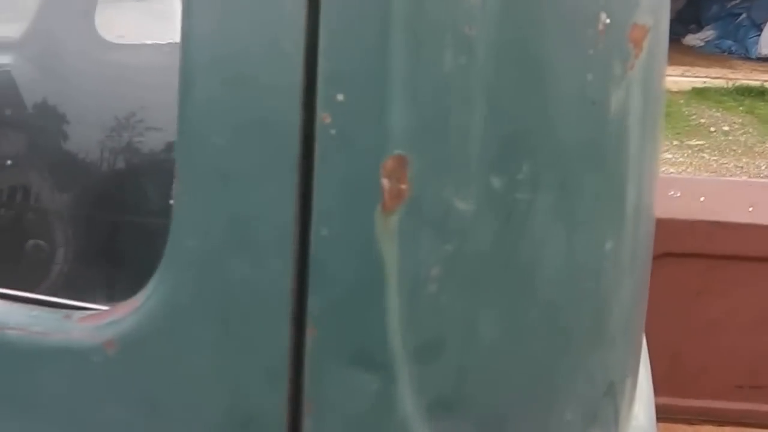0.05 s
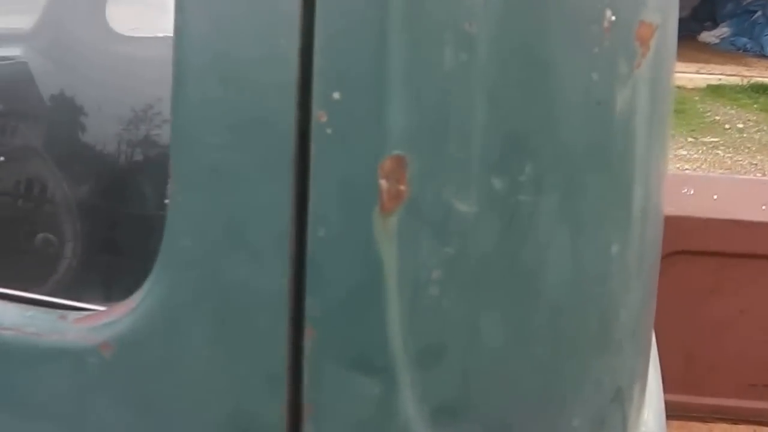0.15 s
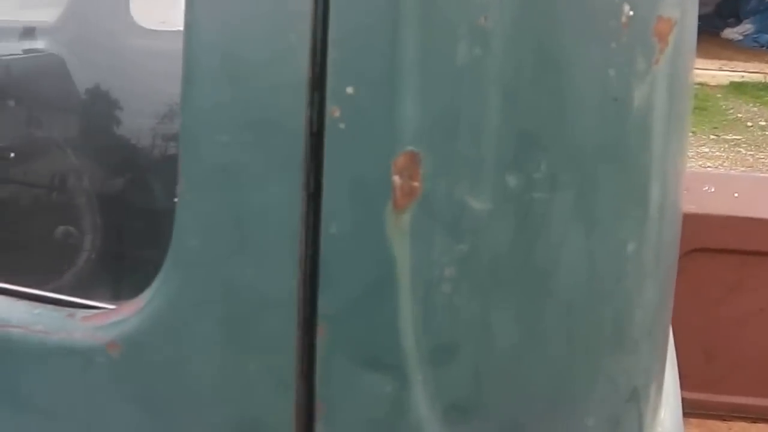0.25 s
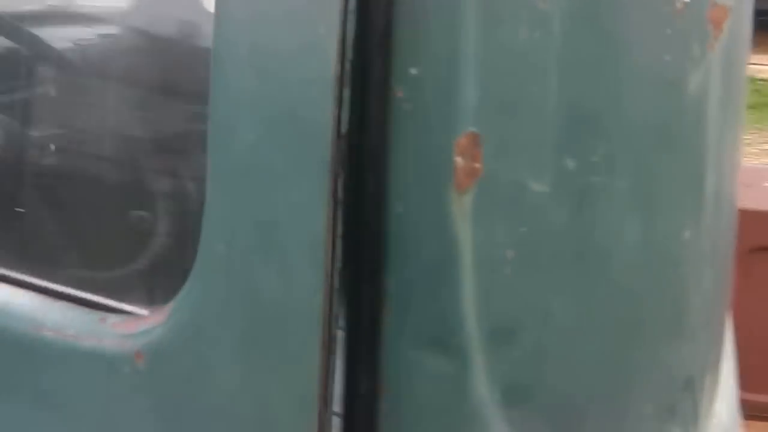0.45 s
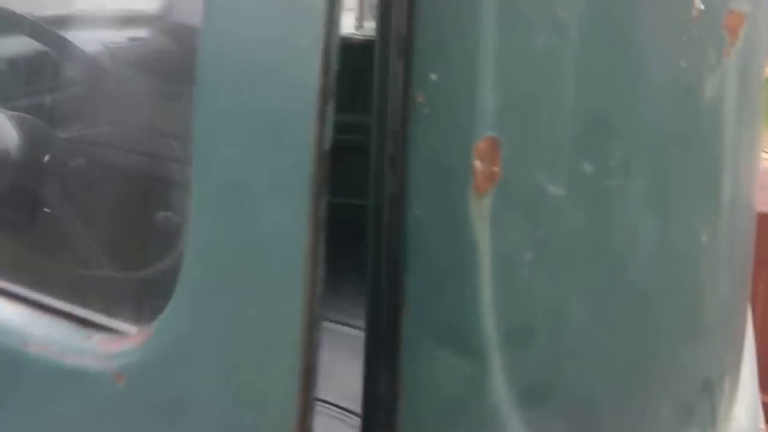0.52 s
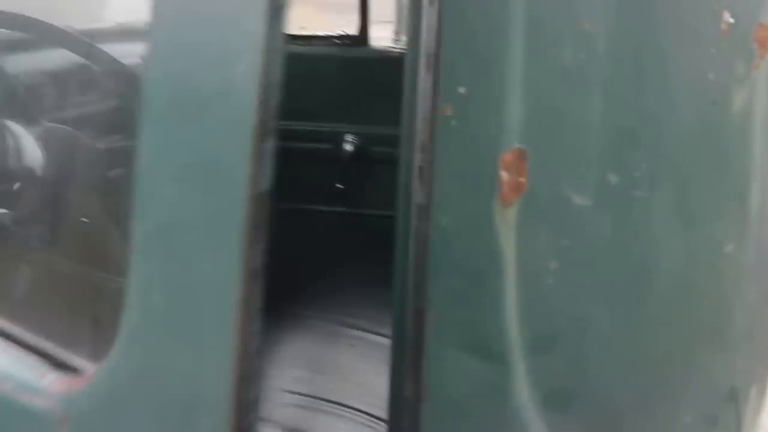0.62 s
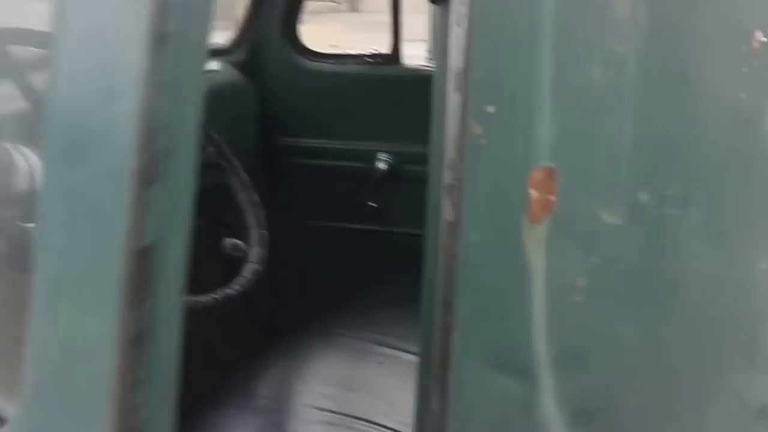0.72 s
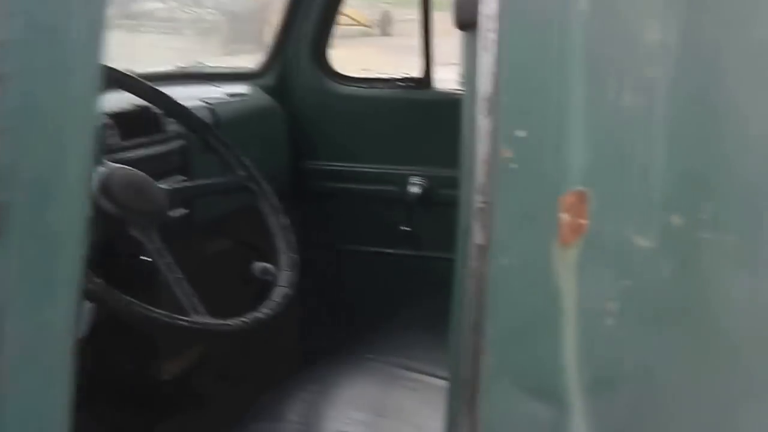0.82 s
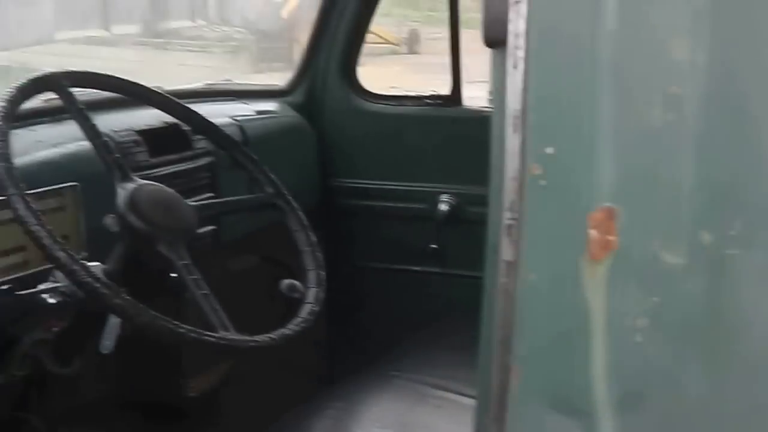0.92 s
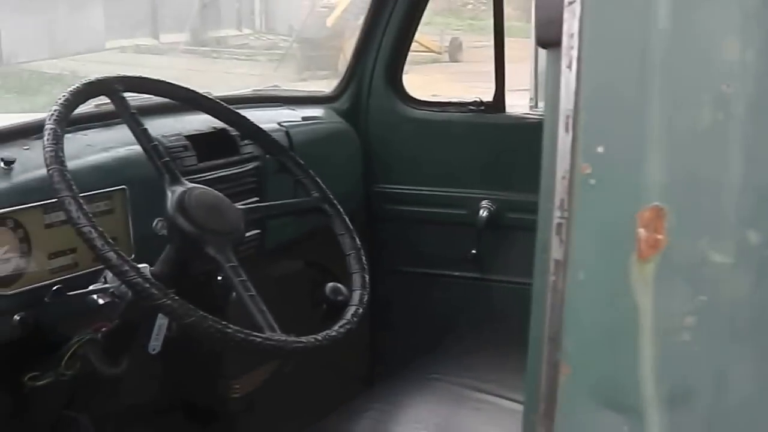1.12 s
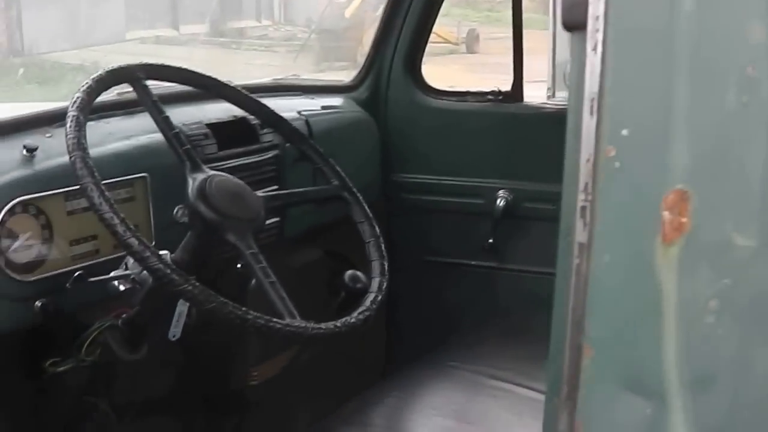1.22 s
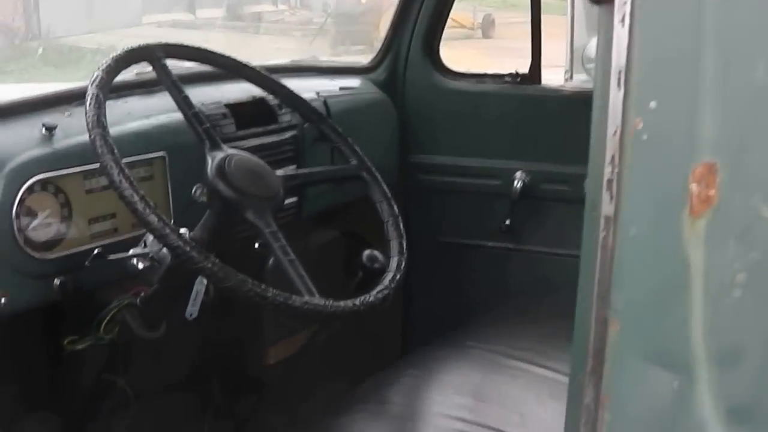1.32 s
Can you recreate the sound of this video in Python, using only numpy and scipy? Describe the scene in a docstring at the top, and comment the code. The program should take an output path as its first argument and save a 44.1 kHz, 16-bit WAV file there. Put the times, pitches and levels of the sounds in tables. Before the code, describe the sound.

Old truck door opening outdoors, with a latch clunk, a brief hinge squeak and a scrape.

```python
"""Outdoors, close to an old truck, on a hand-held stereo microphone: the steel door is opened.
First the loose handle rattles, then the latch bolt groans and lets go with a clunk. The dry hinge gives a
shrill squeak, mostly on the left; the door scrapes and clunks again as it swings, and last a faint
squeal trails off. Panel and cab ring after each blow; soft low bumps and outdoor air lie underneath."""
import sys
import numpy as np
from scipy import signal
from scipy.fft import rfft, irfft, next_fast_len
from scipy.io import wavfile
from scipy.ndimage import uniform_filter1d, minimum_filter1d, map_coordinates

SR = 44100
rng = np.random.default_rng(int(sys.argv[2]) if len(sys.argv) > 2 else 0)


def master(y):
    """Save y as 16-bit WAV."""
    cut = np.clip(np.atleast_2d(y).T, -1, 1)
    pcm = np.round(cut * 32767)  # scale
    wavfile.write(sys.argv[1], SR, pcm.astype(np.int16))


N = 59535

# blows as the latch lets go (time [s], clatter [dB], tilt [dB/octave], ring [dB], focus [Hz])
LATCH_BLOWS = [(.166, -37.5, -8, -39.5, 377), (.2195, -20.5, -1, -19.5, 780), (.2289, -24.5, 5, -16, 840),
               (.2593, -16.5, 4.5, -41, 1300), (.27, -14.5, 1, -15.5, 385), (.287, -25.5, 1, -17, 1320),
               (.3087, -34, -5, -24.5, 394)]
# jolts on the hinges (time [s], clatter [dB], tilt [dB/octave], ring [dB], focus [Hz])
SWING_BLOWS = [(.6432, -22.5, 4.5, -58, 1760), (.657, -27.5, 6.5, -29, 407), (.676, -28, -1.5, -24.5, 485),
               (.7065, -27.5, 13.5, -23.5, 1080), (.7165, -25.5, -2, -17, 676)]
# the door ringing in its frame (frequency [Hz], level [dB], t60 [s])
SHUT_MODES = [(363.5, 0.5, 0.33), (404.6, 0, 0.28), (795.4, -1.5, 0.29), (851, -4, 0.15), (1148, -8, 0.073),
              (1284.4, -2.5, 0.15), (1565, -18, 0.19)]
# the free door panel (frequency [Hz], level [dB], t60 [s])
OPEN_MODES = [(120.2, 13, 1), (277, -1, 0.47), (377, 4.5, 0.32), (593.5, -1, 0.23), (750, 1.5, 0.16),
              (880, -18, 0.34), (1085, 0, 0.088), (1610, -26, 0.08), (1843, -13, 0.97)]
# clatter of struck steel (frequency [Hz], level [dB])
STEEL_SPECTRUM = [(40, -21), (130, -7), (240, -11), (500, -7), (850, -3.5), (1500, -1.5), (2300, -10.5),
                  (6500, -21), (9000, -31.5)]
# decay of that clatter (frequency [Hz], t60 [s])
STEEL_T60 = [(200, 0.67), (1000, 0.17), (3000, 0.19), (14000, 0.088)]
# metal rubbing on metal (start [s], end [s], level [dB], rise [s], release [s], tilt [dB/octave])
SCRAPES = [(0, 0.05, -42.5, 0.00065, 0.51, 2), (0.113, 0.21, -34.5, 0.14, 0.023, 2.5),
           (0.192, 0.273, -20.5, 0.063, 0.19, 1.5), (0.401, 0.496, -39.5, 0.077, 0.16, 6),
           (0.56, 0.652, -28, 0.15, 0.038, 0), (0.642, 0.709, -21.5, 0.018, 0.18, 0)]
# colour of the rubbing (frequency [Hz], level [dB])
RUB_SPECTRUM = [(100, -15), (400, 4.5), (1600, 1.5), (2400, -1), (6000, -14), (10000, -20.5)]
# the hinge squeak (time [s], pitch [Hz], level [dB], left over right [dB])
SQUEAK_PATH = [(0.461, 5620, -52, 10), (.464, 5784, -19, 14), (0.473, 5756, -9, 10.5),
               (0.484, 5722, -7.5, 3), (0.495, 5655, -11, 9), (0.503, 5690, -22, 1), (.52, 5676, -24, -23),
               (0.534, 5625, -37, 22), (0.612, 5590, -77, 2)]
# hiss around the squeak (frequency [Hz], level [dB])
HISS_SPECTRUM = [(2000, -24), (4750, -5), (5700, 4), (8000, -29), (11400, -10), (16000, -24)]
# latch bolt and hinge sliding under load (start [s], end [s], first pitch [Hz], last [Hz], level [dB])
GROANS = [(0.234, .284, 1095, 1315, -19.5), (0.454, 0.504, 981, 1020, -38.5)]
# dry clicks of handle and latch (time [s], level [dB], t60 [s])
CLICKS = [(0.0697, -36, 0.004), (0.2595, -34, 0.03), (0.6231, -29.5, 0.22), (0.7079, -6.5, 0.016),
          (.7105, -20.5, 0.1), (0.981, -38.5, 0.019)]
# colour of a click (frequency [Hz], level [dB])
CLICK_SPECTRUM = [(1500, 8.5), (7000, -2), (12000, -2.5)]
# the loose handle ticking (time [s], level [dB])
HANDLE_TICKS = [(.005, -33.5), (0.0143, -38.5), (.028, -35.5), (0.055, -31.5), (0.0673, -25.5),
                (0.086, -38)]
# the handle's ring (frequency [Hz], level [dB])
HANDLE_MODES = [(1280, -8.5), (1700, -5), (2750, -9), (3950, -8.5)]
# the two drifting tones of the squeal (time [s], low pitch [Hz], high pitch [Hz], level [dB])
SQUEAL_PATH = [(1.012, 5780, 5970, -57), (1.02, 5560, 5960, -38.5), (1.059, 5360, 5640, -39.5),
               (1.138, 5290, 5800, -45), (1.17, 5380, 5600, -49.5), (1.32, 5350, 5630, -59.5)]
# decay of the cab and the yard (frequency [Hz], t60 [s])
CAB_T60 = [(1500, 0.75), (5500, 0.25)]
# soft bumps on the microphone (time [s], level [dB])
BUMPS = [(0.045, -31.5), (0.078, -34), (0.123, -36), (.17, -35.5), (0.572, -40.5), (0.662, -31),
         (1.186, -36), (1.263, -40.5)]
# colour of a bump (frequency [Hz], level [dB])
BUMP_SPECTRUM = [(25, -14.5), (110, -1.5), (170, -6), (260, -27), (800, -46)]
# outdoor air (frequency [Hz], level [dB])
AIR_SPECTRUM = [(25, -4.5), (120, 7), (220, -17.5), (400, -6), (700, -16.5), (1700, -15.5), (4000, -20),
                (9000, -27.5)]
# stereo image of door, cab and bumps (frequency [Hz], left-right correlation [-1 to 1])
CLOSE_IMAGE = [(60, 0.075), (140, 0.94), (1200, 1), (3100, 0.66), (7000, 0.065)]
# stereo image of air and hiss (frequency [Hz], left-right correlation [-1 to 1])
AIR_IMAGE = [(100, -0.62), (400, 0.73), (7000, -0.14)]
# the door's balance at the microphone (frequency [Hz], left over right [dB])
DOOR_BALANCE = [(1400, -1), (4400, 3), (8100, 5), (15000, -2.5)]

DOOR_FREE_S = .5  # scrapes from here on sound through the free panel
ATTACK_S, FOCUS_DB_PER_OCTAVE = 0.00045, 15.5
BODY_DB, BODY_WIDTH_HZ = 4, 38
RATTLE_DB, RATTLE_PER_S, RATTLE_JITTER_HZ = 2, 60, 22
SLIP_DB, SLIPS_PER_S = 2.3, 260
OCTAVE_DB, HISS_DB = -7.5, -19.5
UNDERTONE_HZ, UNDERTONE_DB, UNDERTONE_FROM_S = 5490, -12, .488
SQUEAL_UPPER_DB, SQUEAL_PAN_DB, CHATTER_DB, CHATTER_PER_S = -5, 4.5, 2.5, 170
DOOR_WET_DB, SQUEAK_WET_DB, SQUEAL_WET_DB = -20, -10.5, -9
AIR_DB, BUMP_WIDTH_S, MIC_LAG_S = -44.5, .015, 5e-5
NOTCH_HZ, NOTCH_WIDTH_HZ, NOTCH_DB = 7850, 350, -15
LIMIT, LIMITER_HOLD_S, TOP_HZ = .97, .003, 15900


def door_body(blow_rows, scrape_rows, modes):
    """Blows and scrapes pass through the hollow door, which favours its modes."""
    def near_mode(hz):
        return np.max([np.exp(-((hz - mode[0]) / BODY_WIDTH_HZ) ** 2) for mode in modes], axis=0)
    clatter, ring = blows(blow_rows, modes)
    return ring + filtered(clatter + scrapes(scrape_rows), lambda hz: amp(BODY_DB * near_mode(hz)))


def blows(rows, modes):
    """A blow sets off steel clatter and the modes near its focus, which waver as the panel rattles."""
    clatter, ring = np.zeros((2, N)), np.zeros((2, N))
    attack = 1 - np.exp(-clock() / ATTACK_S)
    for start, clatter_db, tilt, ring_db, focus_hz in rows:
        tones = np.zeros(N)
        for hz, db, t60 in modes:
            off_focus_db = FOCUS_DB_PER_OCTAVE * abs(np.log2(hz / focus_hz))
            level = amp(db - off_focus_db + RATTLE_DB * wobble(RATTLE_PER_S))
            tones += level * fade(t60) * np.sin(unsteady_phase(hz, RATTLE_JITTER_HZ))
        steel = fade_by_band(noise(STEEL_SPECTRUM, CLOSE_IMAGE, tilt), STEEL_T60)
        add(clatter, start, attack * amp(clatter_db) * steel)
        add(ring, start, attack * amp(ring_db) * tones)
    return clatter, ring


def scrapes(rows):
    """Metal rubs on metal in uneven slips; each stroke swells, holds and lets go."""
    out, t = np.zeros((2, N)), clock()
    for start, end, db, rise, release, tilt in rows:
        stroke = np.clip((t - start) / rise, 0, 1) * amp(-60 * np.maximum(t - end, 0) / release)
        rub = noise(RUB_SPECTRUM, CLOSE_IMAGE, tilt) * amp(SLIP_DB * wobble(SLIPS_PER_S))
        out += amp(db) * stroke * unit_rms(rub)
    return out


def hinge_squeak():
    """The dry hinge sings a high note with its octave and a hiss; a lower tone joins and beats with it."""
    t = clock()
    times, *columns = np.transpose(SQUEAK_PATH)
    hz, db, side_db = (np.interp(t, times, column) for column in columns)
    level = amp(db) * (t > times[0]) * (t < times[-1])
    phase = unsteady_phase(hz, jitter_hz=20)
    joining = np.clip((t - UNDERTONE_FROM_S) / ATTACK_S, 0, 1)
    undertone = amp(UNDERTONE_DB) * joining * np.sin(unsteady_phase(UNDERTONE_HZ, jitter_hz=40))
    flutter = amp(1.5 * np.array([wobble(110), wobble(110)]))  # each channel on its own
    tones = pan(side_db) * np.sin(phase) + undertone + amp(OCTAVE_DB) * np.sin(2 * phase)
    hiss = amp(HISS_DB) * noise(HISS_SPECTRUM, AIR_IMAGE)
    direct = level * (np.sqrt(2) * flutter * tones + hiss)
    return from_hinge_side(direct) + amp(SQUEAK_WET_DB) * cab_echo(direct)


def groans():
    """Sliding metal sings briefly, its pitch rising with the load."""
    out, t = np.zeros(N), clock()
    for start, end, first_hz, last_hz, db in GROANS:
        travel = np.clip((t - start) / (end - start), 0, 1)
        phase = unsteady_phase(first_hz + (last_hz - first_hz) * travel, jitter_hz=25)
        out += amp(db + SLIP_DB * wobble(SLIPS_PER_S)) * np.sin(np.pi * travel) * np.sin(phase)
    return out


def latch_clicks():
    """Latch and handle parts meet in short bright contacts."""
    out, attack = np.zeros((2, N)), 1 - fade(t60=0.0031)
    for start, db, t60 in CLICKS:
        add(out, start, amp(db) * noise(CLICK_SPECTRUM, CLOSE_IMAGE) * fade(t60) * attack)
    return out


def handle_rattle():
    """Each tick snaps and rings the loose handle briefly."""
    out, t = np.zeros((2, N)), clock()
    for start, db in HANDLE_TICKS:
        ring = sum(amp(level) * np.sin(2 * np.pi * (hz * t + rng.random())) for hz, level in HANDLE_MODES)
        snap = noise(CLICK_SPECTRUM, CLOSE_IMAGE)
        add(out, start, amp(db) * (ring + snap) * fade(t60=0.039))
    return out


def hinge_squeal():
    """A weak, rough double tone, left of centre, chatters and breaks up as the door slows."""
    times, low_hz, high_hz, db = np.transpose(SQUEAL_PATH)
    t = clock()

    def tone(hz):
        chatter = amp(CHATTER_DB * wobble(CHATTER_PER_S))
        return chatter * np.sin(unsteady_phase(np.interp(t, times, hz), jitter_hz=58))
    level = amp(np.interp(t, times, db, left=-120, right=-120))
    direct = pan(SQUEAL_PAN_DB) * level * unit_rms(tone(low_hz) + amp(SQUEAL_UPPER_DB) * tone(high_hz))
    return from_hinge_side(direct) + amp(SQUEAL_WET_DB) * cab_echo(direct)


def cab_echo(x):
    """The cab and the yard answer with a diffuse tail, the treble dying first."""
    wash = noise([(100, 0.007), (10000, 0)], CLOSE_IMAGE)  # all but white
    tail = fade_by_band(wash, CAB_T60) * (1 - fade(t60=0.027))
    return signal.fftconvolve(x, tail / np.linalg.norm(tail[0]), axes=1)[:, :N]


def microphone_bumps():
    """Soft low bumps on the hand-held microphone."""
    swell = sum(amp(db) * np.exp(-((clock() - time) / BUMP_WIDTH_S) ** 2) for time, db in BUMPS)
    return swell * noise(BUMP_SPECTRUM, CLOSE_IMAGE)


def outdoor_air():
    """Quiet air around the truck, wavering by about a decibel."""
    return amp(AIR_DB + wobble(7.33)) * noise(AIR_SPECTRUM, AIR_IMAGE)


def from_hinge_side(x):
    """Sound from the hinge side reaches the right channel a little later."""
    return filtered(x, lambda hz: np.exp(2j * np.pi * hz * MIC_LAG_S * np.array([[.5], [-.5]])))


def unsteady_phase(hz, jitter_hz):
    """The phase of a rubbed or rattling tone whose pitch jitters."""
    return 2 * np.pi * np.cumsum(hz + jitter_hz * wobble(600)) / SR


def noise(spectrum, image, tilt=0):
    """Stereo noise of rms 1, tilted in dB per octave between 250 and 5000 Hz."""
    def mid_side_gains(hz):
        colour = amp(along(spectrum, hz) + tilt * np.log2(np.clip(hz, 250, 5000)))
        spread = np.arccos(np.clip(along(image, hz), -1, 1)) / 2
        return colour * [np.cos(spread), np.sin(spread)]
    mid, side = filtered(rng.standard_normal((2, N)), mid_side_gains)
    return unit_rms(np.array([mid + side, mid - side]))


def fade_by_band(x, t60_points):
    """Each frequency of x dies at its own speed."""
    hz, t, bands = signal.stft(x, SR, nperseg=256)
    decay = amp(-60 * t / along(t60_points, hz)[:, None])
    return signal.istft(bands * decay, SR, nperseg=256)[1][:, :N]


def fade(t60):
    """A decay that loses 60 dB in t60 seconds."""
    return amp(-60 * clock() / t60)


def wobble(rate):
    """A smooth random curve, rate knots a second."""
    return map_coordinates(rng.standard_normal(int(N * rate / SR) + 4), [clock() * rate])


def filtered(x, response):
    """x through a frequency response."""
    size = next_fast_len(N + SR // 4)
    return irfft(rfft(x, size) * response(np.fft.rfftfreq(size, 1 / SR)), size)[..., :N]


def along(points, hz):
    """Interpolate (frequency [Hz], value) points on a log axis."""
    knots_hz, values = np.transpose(points)
    return np.interp(np.log(hz + 1), np.log(knots_hz + 1), values)


def pan(db):
    """Left and right gains for a level difference."""
    return amp(db * np.array([[.5], [-.5]]))


def add(out, start_s, x):
    """Mix x into out from start_s on."""
    i = max(round(start_s * SR), 0)
    out[:, i:] += x[..., :N - i]


def amp(db):
    return 10 ** (np.asarray(db) / 20)


def unit_rms(x):
    return x / np.sqrt(np.mean(x ** 2) + 1e-20)


def clock():
    return np.arange(N) / SR


def scene():
    """At the microphone: the door unlatching and swinging, its echo, the hinge, then air and bumps."""
    shut = door_body(LATCH_BLOWS, [row for row in SCRAPES if row[0] < DOOR_FREE_S], SHUT_MODES)
    swinging = door_body(SWING_BLOWS, [row for row in SCRAPES if row[0] >= DOOR_FREE_S], OPEN_MODES)
    metal = shut + swinging + handle_rattle() + latch_clicks() + groans()
    door = filtered(metal, lambda hz: pan(along(DOOR_BALANCE, hz)))
    echo = amp(DOOR_WET_DB) * cab_echo(door)
    return door + echo + hinge_squeak() + hinge_squeal() + outdoor_air() + microphone_bumps()


def record(dry):
    """The microphone has a narrow treble dip; a fast limiter holds the peaks, and the very top is cut."""
    coloured = filtered(dry, lambda hz: amp(NOTCH_DB * np.exp(-((hz - NOTCH_HZ) / NOTCH_WIDTH_HZ) ** 2)))
    hold = round(LIMITER_HOLD_S * SR)
    needed_gain = LIMIT / np.maximum(np.abs(coloured).max(axis=0), LIMIT)
    gain = uniform_filter1d(minimum_filter1d(needed_gain, 2 * hold), hold)
    return filtered(coloured * gain, lambda hz: hz < TOP_HZ)


dry = scene()
out = record(dry)
master(out)
```